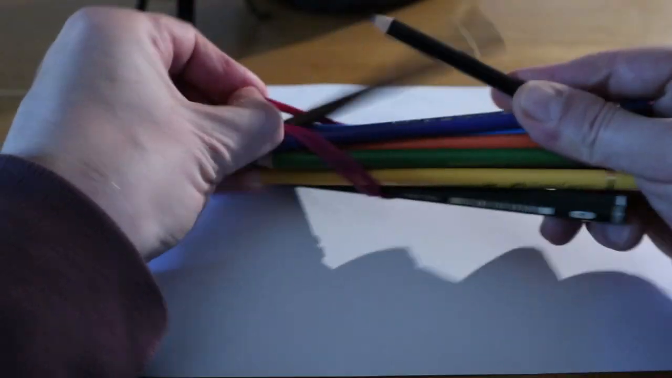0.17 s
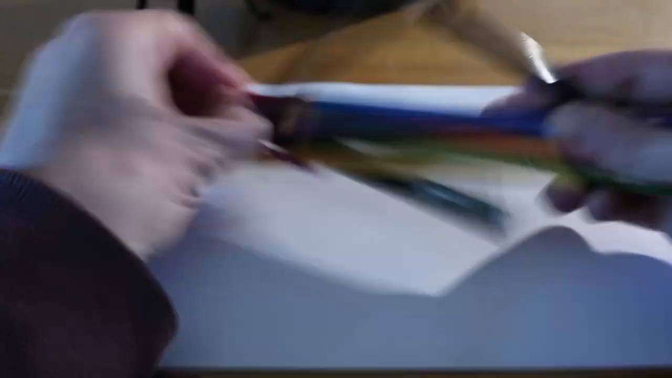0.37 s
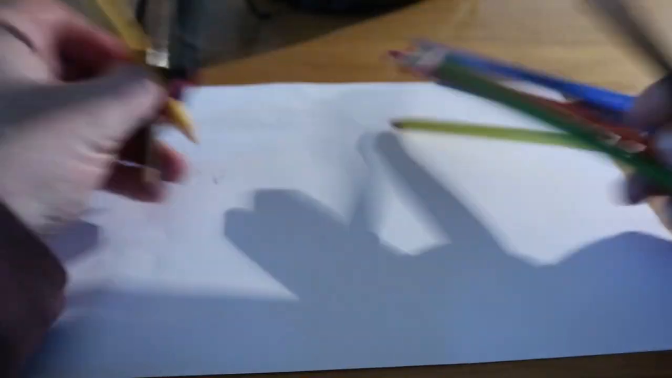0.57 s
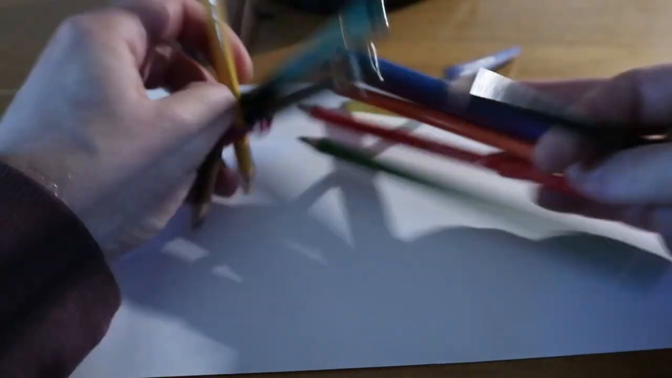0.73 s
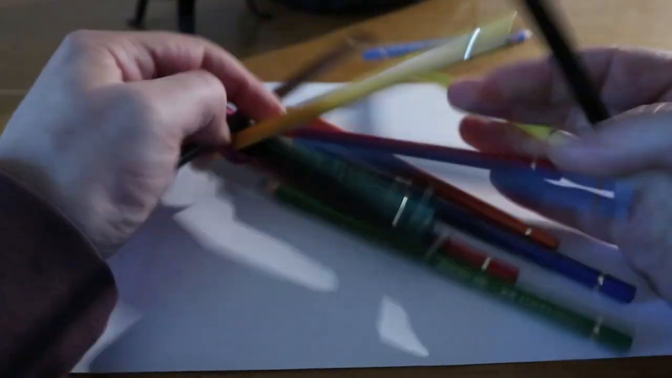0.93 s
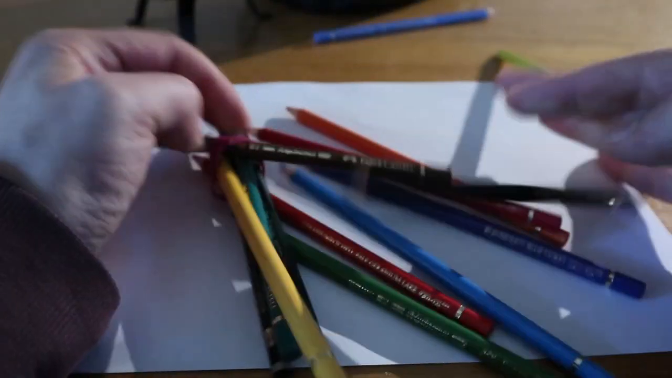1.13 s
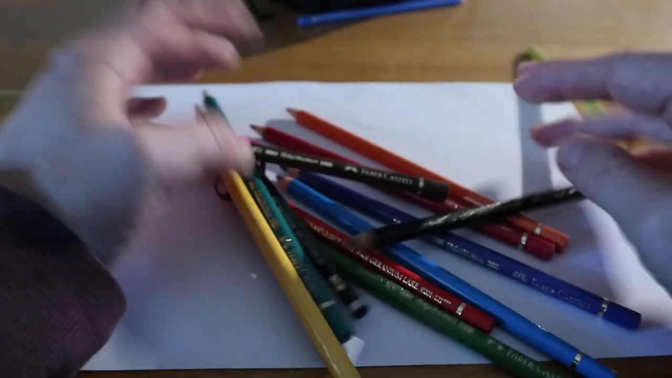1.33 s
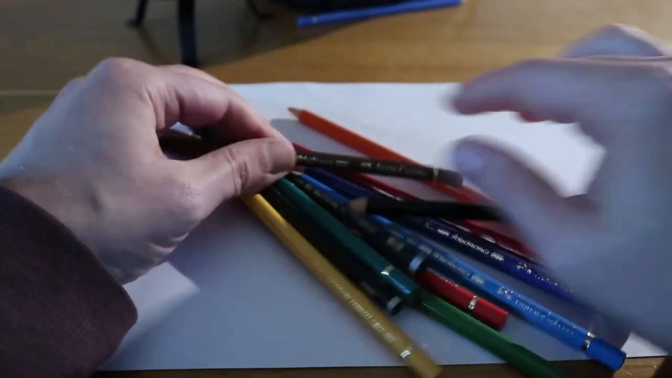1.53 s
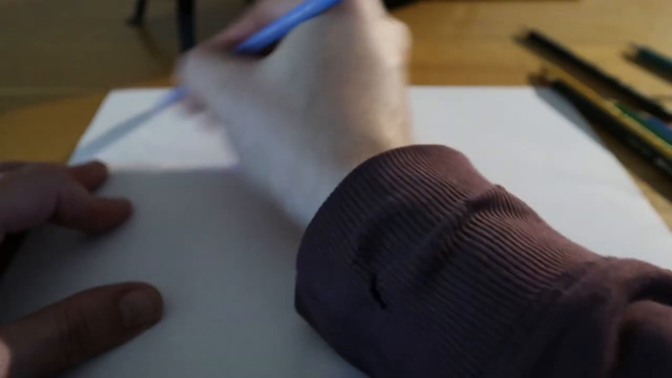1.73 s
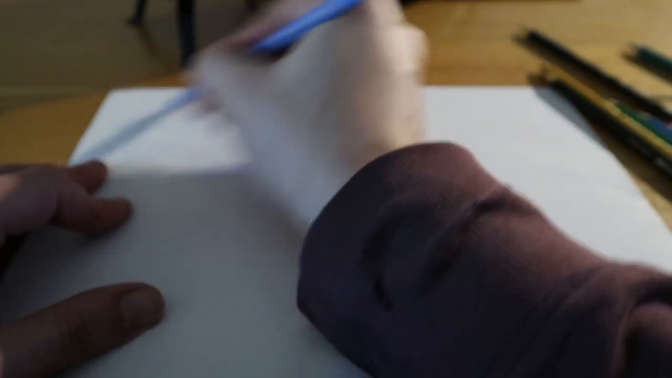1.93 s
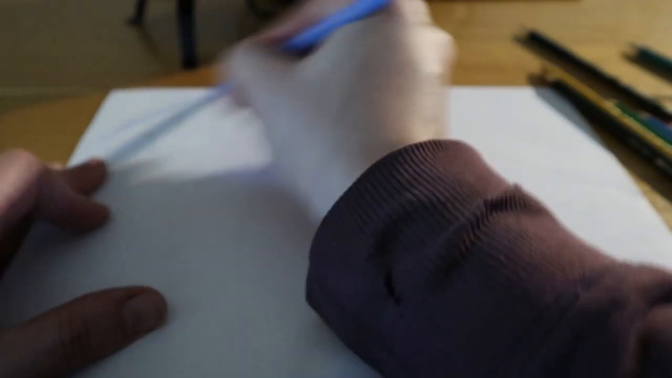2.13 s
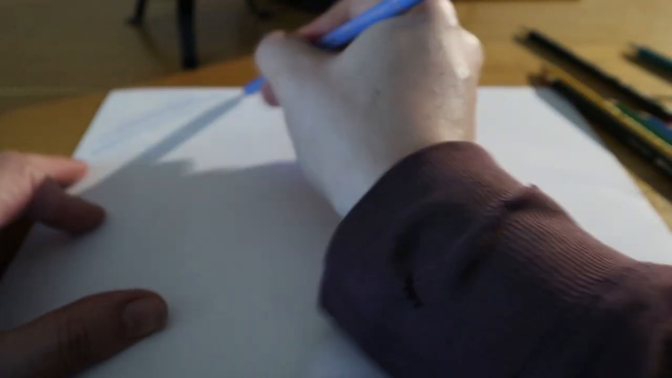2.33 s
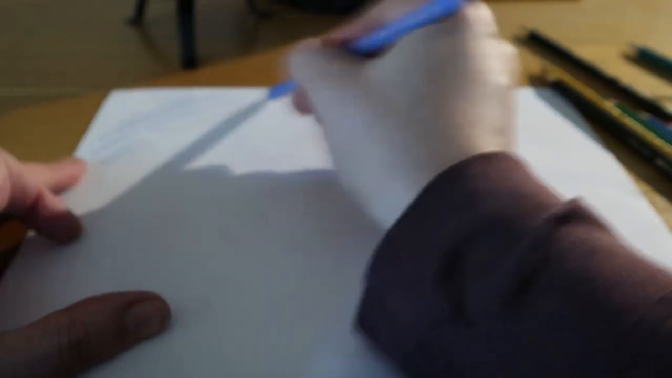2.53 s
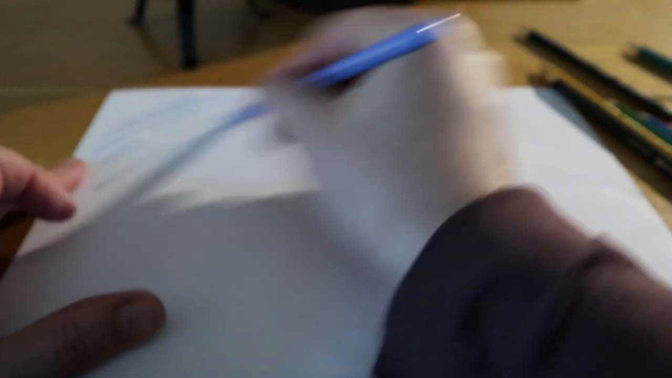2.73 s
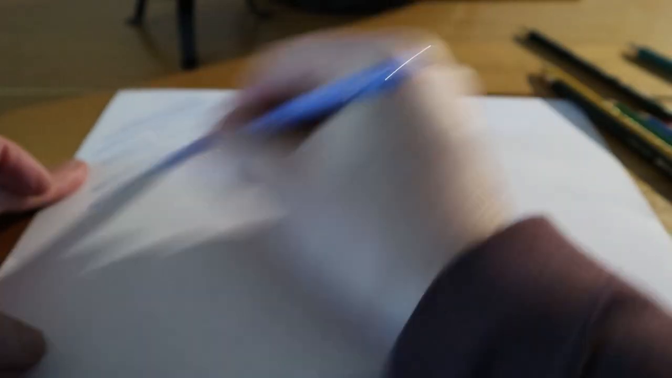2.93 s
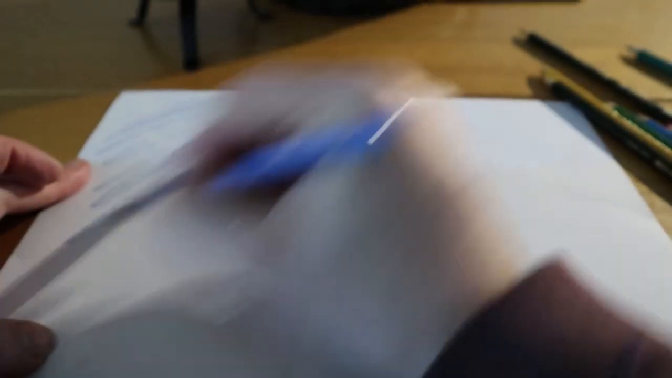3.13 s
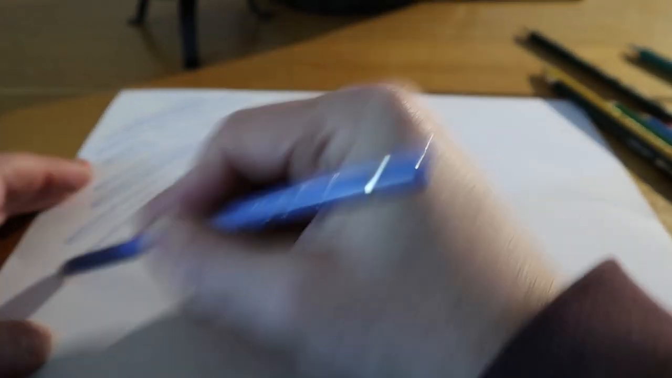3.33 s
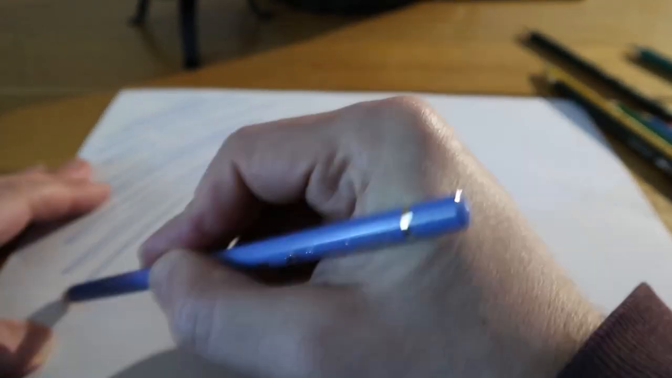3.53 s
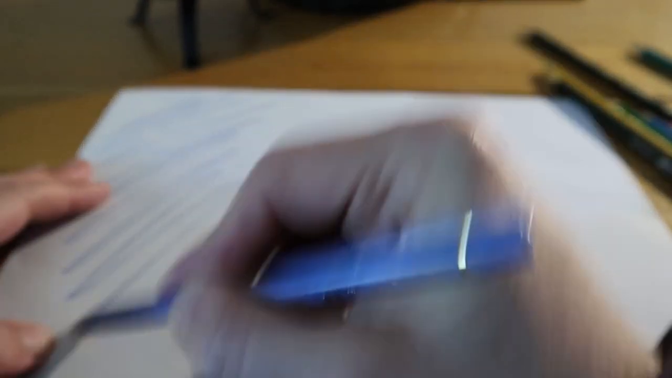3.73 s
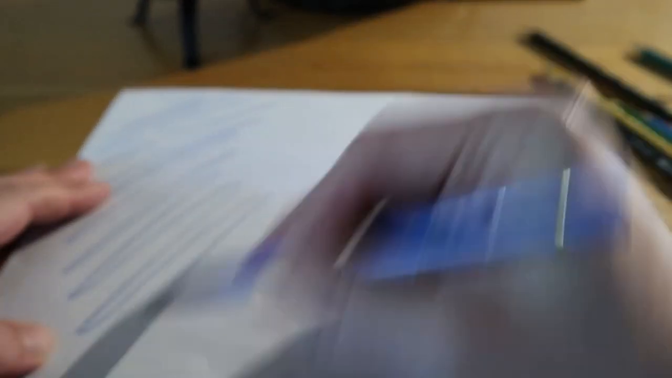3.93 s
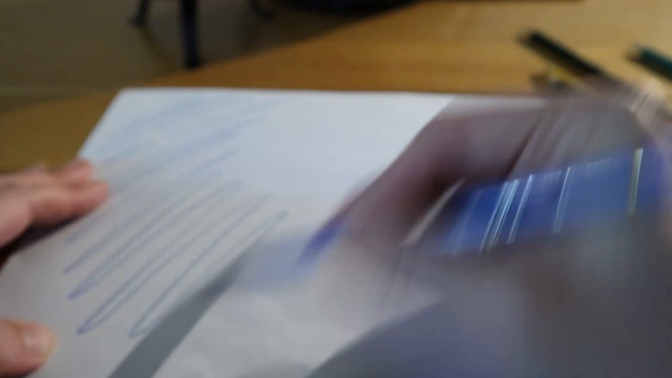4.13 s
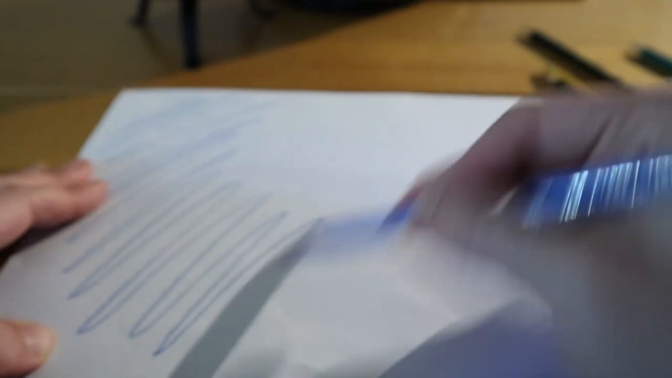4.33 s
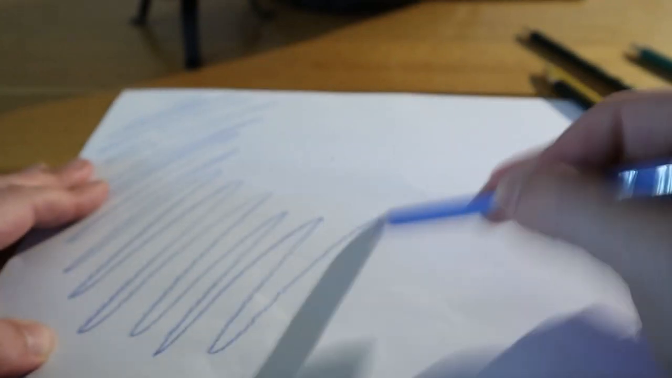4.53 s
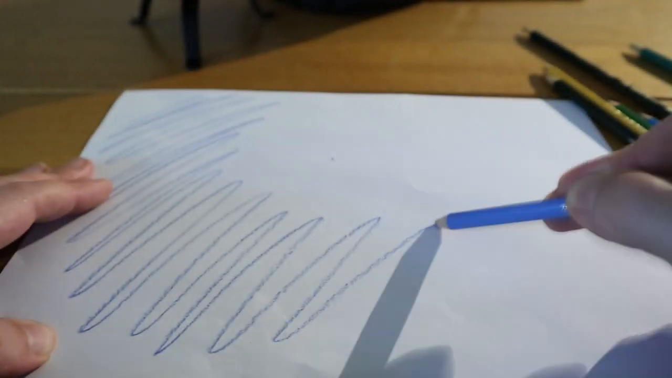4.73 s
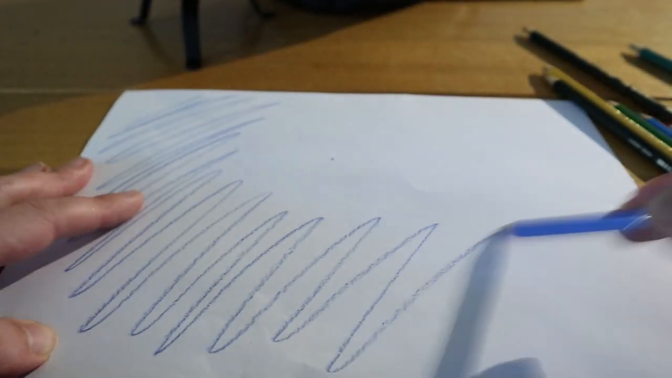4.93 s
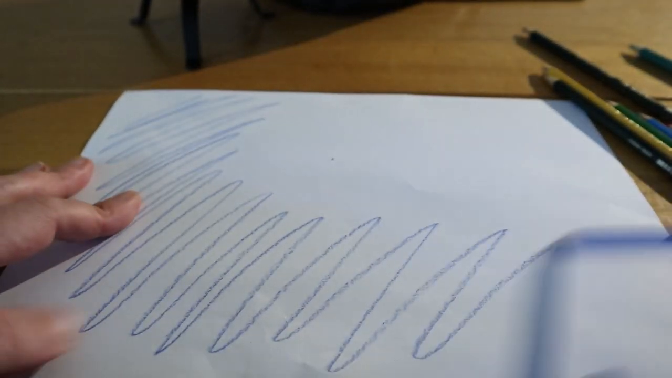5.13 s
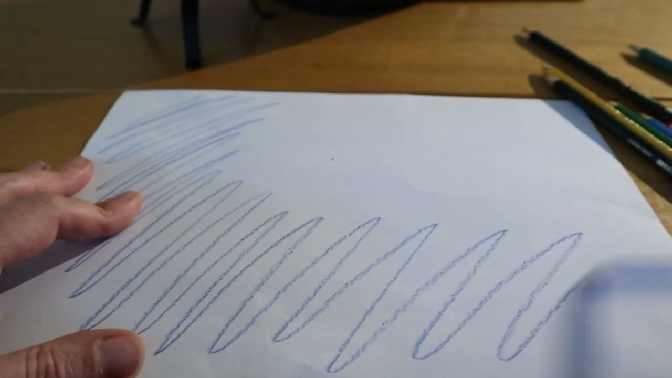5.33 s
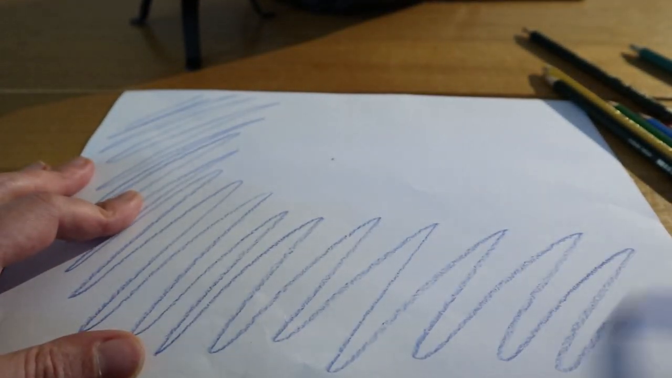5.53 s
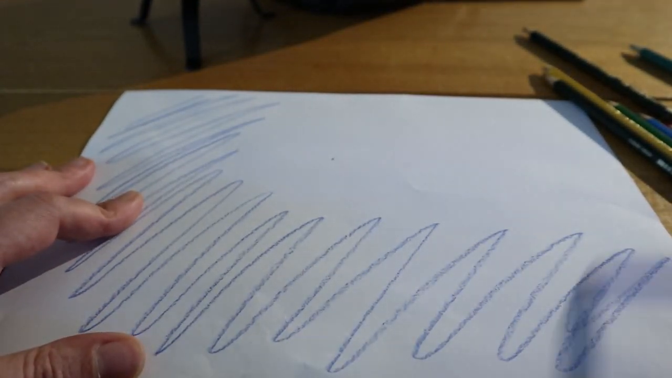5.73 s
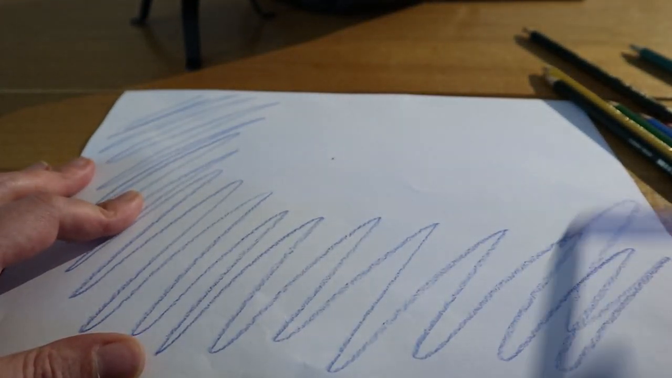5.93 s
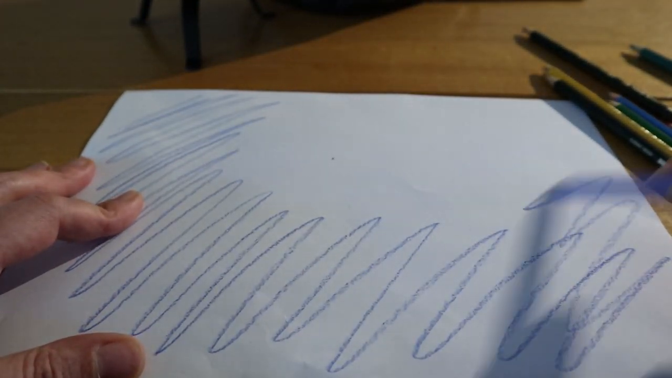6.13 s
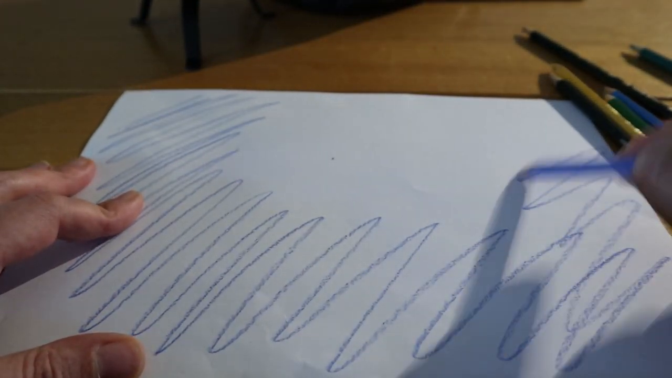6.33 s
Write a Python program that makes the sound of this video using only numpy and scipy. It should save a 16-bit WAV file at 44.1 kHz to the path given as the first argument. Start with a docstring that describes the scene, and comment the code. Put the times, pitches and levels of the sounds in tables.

```python
"""Pencils on a table

An elastic band drags and snaps off a bundle of wooden pencils, which drop and clatter on a table; then one
pencil scribbles to and fro on paper, moving from left to right, and at last nudges the pile.
Random impulses excite resonant shafts and table top (scrape, crackle); short pulses and decaying sines make
the blows. A short diffuse echo, steady air noise and a wavering hum complete a close stereo pickup."""
import sys
import numpy as np
from scipy import signal
from scipy.fft import rfft, irfft, next_fast_len
from scipy.io import wavfile
from scipy.ndimage import uniform_filter1d, map_coordinates

SR = 44100
rng = np.random.default_rng(int(sys.argv[2]) if len(sys.argv) > 2 else 0)


def digitize_waveform(pressure):
    """Quantize a signal to 16-bit integers and store it at the path in sys.argv[1].

    Rows of a 2-D input are taken as channels; values are limited to [-1, 1].
    """
    field = np.atleast_2d(pressure).T
    bounded = np.clip(field, -1, 1)
    quanta = np.round(bounded * 32767).astype(np.int16)
    wavfile.write(sys.argv[1], SR, quanta)


N = 286209
TIME = np.arange(N) / SR  # s

PEAK_OUT, PEAK_BACK = 0.48, 0.42  # share of a stroke at which speed peaks
TURN_DB, TURN_SCATTER_DB = -52, 4  # mean speed left at a turn, under the peak, and its spread


def hand_motion(start, back):
    """Harmonic motion: speed is nearly a rectified sine of phase, which gains one half-cycle a stroke."""
    peak_share = np.where(back, PEAK_BACK, PEAK_OUT)
    middle = start + peak_share * np.diff(np.append(start, N / SR))
    knots = np.append(np.ravel([start, middle], "F"), N / SR)
    phase = np.interp(TIME, knots, np.arange(2 * len(start) + 1) / 2)
    swing = np.abs(np.sin(np.pi * phase)) ** 0.95
    turn_db = TURN_DB + TURN_SCATTER_DB * rng.standard_normal(len(start))
    rest = np.minimum(amp(np.interp(TIME, start, turn_db)), 1)  # the tip never quite stops
    speed = (rest + (1 - rest) * swing) * (TIME > start[0])
    return middle, phase, speed


# Strokes, out and back in turn: start t/s, paper hiss level/dB, lower shaft modes level/dB over the hiss
STROKE_ROWS = [(1.63, -44.5, 0), (1.768, -39.5, -5), (1.877, -40.5, -4), (1.977, -39, -4),
               (2.076, -39.5, -0.5), (2.185, -35.5, -6), (2.29, -39, -2), (2.405, -37, -2.5),
               (2.513, -36, 3.5), (2.622, -37, -4), (2.732, -38, 0.5), (2.843, -37, -4), (2.956, -38.5, -3),
               (3.066, -37.5, 0.5), (3.174, -37.5, 2.5), (3.282, -39.5, -0.5), (3.408, -38, -9),
               (3.503, -39.5, -3), (3.614, -40, -9), (3.728, -36, 0), (3.832, -39.5, -4.5),
               (3.946, -38, -6), (4.054, -41, -6.5), (4.166, -38, -2.5), (4.271, -40, -1.5),
               (4.384, -38.5, -2), (4.482, -40, -2), (4.597, -38.5, -2.5), (4.693, -40, -5),
               (4.813, -39.5, 1.5), (4.917, -36, -12), (5.03, -40.5, -4.5), (5.13, -39, -5.5),
               (5.247, -41, -4), (5.351, -41, -5.5), (5.461, -41, -0.5), (5.561, -42.5, -1),
               (5.679, -41.5, 2), (5.771, -40.5, -3), (5.887, -41.5, -3), (5.983, -40, -8),
               (6.069, -39, -1.5), (6.177, -38, -9.5), (6.291, -39.5, -18), (6.392, -35, -15)]
# Graphite on fibres, spectrum of the hiss: f/Hz, relative level/dB per Hz
PAPER_SPECTRUM = [(300, -6), (1000, -4.5), (2200, -12.5), (2750, -12), (3300, -8), (3900, -11.5),
                  (5000, -9), (6000, -6), (7200, -5.5), (8400, -7.5), (10200, -1.5), (11500, -6.5),
                  (13000, -6.5), (15500, -10.5)]
# Held pencil, lower bending modes: f/Hz, width/Hz, relative level/dB
SHAFT_LOW_MODES = [(1380, 124, -12), (1630, 224, -3), (1726, 121, 4.5), (3144, 580, -11)]
# Held pencil, upper modes: f/Hz, width/Hz, relative level/dB
SHAFT_HIGH_MODES = [(4940, 500, 10), (7120, 660, 2.5), (9700, 1700, 4)]
# Upper shaft modes over the hiss: t/s, level/dB on strokes out, level/dB on strokes back
UPPER_LEVELS = [(1.63, -3.5, -13), (2.5, -4.5, -14), (3.3, 5.5, -7), (4.2, -1.5, -8.5), (4.9, -6, -12),
                (5.4, 2, 1), (5.8, -6.5, -10), (6.49, -19, -18)]
# Mean pitch sought by the main shaft mode as the fingers shift: t/s, f/Hz
GRIP_PITCH = [(1.69, 1787), (3.49, 1735), (4.87, 1786), (5.23, 1850), (5.53, 1710), (5.71, 1710),
              (5.86, 1920), (6.29, 1785), (6.45, 1900)]
# Mean pitch sought by the first upper mode, drifting as the pencil tilts: t/s, f/Hz
TILT_PITCH = [(1.65, 4480), (1.76, 4650), (3.33, 4880), (3.35, 5250), (4.87, 4940), (5.56, 5580),
              (5.8, 5100), (6.05, 5100)]
# Bands between the modes where the shaft weakens the scrape: f/Hz, width/Hz
SHAFT_HOLLOWS = [(2750, 340), (3950, 410), (5950, 430)]
GRIP_SCATTER = 0.023  # further share by which each stroke's pitch strays
SWEEP = 0.027  # share either side of the mean: the upper pitch rises on strokes out, falls on the way back


def scribble():
    """Friction excitation: fibres pluck the tip in step with hand speed; shaft and table resonate."""
    start, hiss_db, low_db = np.transpose(STROKE_ROWS)
    back = np.arange(len(start)) % 2 == 1
    middle, phase, speed = hand_motion(start, back)
    s, out_db, back_db = np.transpose(UPPER_LEVELS)
    high_db = np.where(back, np.interp(start, s, back_db), np.interp(start, s, out_db))

    def level(db):
        return speed * amp(np.interp(TIME, middle, db))

    def finger_weight():
        # the fingers shift weight between the modes
        return flutter(14, depth_db=1.8)

    fibres = filtered(grit(0.12, spread_db=3), lambda hz: amp(along(PAPER_SPECTRUM, hz)))
    hiss = unit(patchy(fibres, depth_db=4))
    treble = filtered(hiss, lambda hz: 1 / (1 + (10500 / (hz + 1)) ** 8))
    # hiss above about 10 kHz grows further with the level of the hiss
    hiss = hiss + treble * (amp(0.044 * (np.interp(TIME, middle, hiss_db) + 37.0)) - 1)

    plucks = grit(0.15, spread_db=1) * flutter(45, depth_db=1.5)
    pitch = np.interp(middle, *np.transpose(GRIP_PITCH)) / SHAFT_LOW_MODES[2][0]
    pitch = pitch + GRIP_SCATTER * rng.standard_normal(len(start))
    # the pitch strays within a stroke too
    ratio = np.interp(TIME, middle, pitch) * flutter(30, depth_db=0.25)
    main_modes = gliding(plucks, SHAFT_LOW_MODES[1:3], ratio) * finger_weight()
    outer_modes = sum(filtered(plucks, modes([mode])) * finger_weight() for mode in SHAFT_LOW_MODES[::3])
    low = unit(main_modes + outer_modes)
    low = low * np.minimum(1.2 * speed, 1) ** 0.56  # a slow tip hardly plucks the shaft

    scrapes = grit(0.1, spread_db=0) * flutter(45, depth_db=2.5)
    tilt = np.interp(TIME, *np.transpose(TILT_PITCH)) / SHAFT_HIGH_MODES[0][0]
    tilt = tilt - SWEEP * np.cos(np.pi * phase)
    high = unit(gliding(scrapes, SHAFT_HIGH_MODES[:1], tilt)
                - filtered(scrapes, modes(SHAFT_HIGH_MODES[1:])))

    board = unit(filtered(grit(0.05, spread_db=4.5), modes(TABLE_MODES)))
    sound = level(hiss_db) * (hiss + amp(-7.5) * board)
    sound += level(hiss_db + low_db) * low + level(hiss_db + high_db) * high

    def hollowed(f):
        # each hollow keeps 0.3 of the amplitude at its centre
        return np.prod([(c * c - f * f + 0.3j * f * w) / (c * c - f * f + 1j * f * w)
                        for c, w in SHAFT_HOLLOWS], 0)

    return filtered(sound, hollowed) + catches()


# The tip catches on the sheet: t/s, relative level/dB, lower shaft modes relative level/dB over it
CATCH_ROWS = [(2.199, -25, 2), (2.537, -19, -2), (3.3156, -25, 8.5), (3.235, -28, -3), (3.473, -19, -1.5),
              (3.688, -17, 0), (3.7, -28.5, 11), (3.88, -10.5, -7), (4.9574, 1.5, -6.5)]


def catches():
    """Impulse response: a noise tick excites paper and upper modes, a unit pulse the lower modes."""
    tick, pluck = np.zeros((2, N))
    for s, db, ring_db in CATCH_ROWS:
        add(tick, s, amp(db - 24.5 - 60 * TIME[:300] / 0.01) * rng.standard_normal(300))
        add(pluck, s, amp(db + ring_db + 27.5) * np.ones(1))
    ticking = filtered(tick, lambda hz: amp(along(PAPER_SPECTRUM, hz)) + 3.8 * modes(SHAFT_HIGH_MODES)(hz))
    return ticking + filtered(pluck, modes(SHAFT_LOW_MODES))


# Pencil meets pencil or table: t/s, peak level/dB before the bass cut, lower ring f/Hz, upper ring f/Hz,
# then relative levels: upper modes/dB, table knock/dB over the peak, middle table modes/dB over the peak
CLACK_ROWS = [(0.064, -35, 2500, 6060, -13, 4, -8), (0.096, -25.5, 3750, 5750, -16, 6.5, -9),
              (0.2252, -20, 3370, 5770, -10.5, -14, -20), (0.2612, -28, 2410, 5650, -15, -14, -15),
              (0.5571, -20.5, 4570, 6440, -11, 11, -12), (0.584, -22, 2900, 7300, 2, 12, -12),
              (0.6379, -15, 1450, 5780, -36, 3, -7), (0.6635, -15.5, 4580, 10400, -10, 6, -9),
              (0.7374, -14.5, 1500, 6240, -12, 4, -13), (0.753, -18.5, 4560, 6300, -5, 11, -9),
              (0.7967, -21, 4660, 6450, -16, -9, -15), (0.824, -14.5, 4030, 6460, -12, -0.5, -17),
              (0.835, -16.5, 4640, 6400, -13, 5, -13), (0.852, -13.5, 4570, 6450, -6, -2, -16),
              (0.863, -16, 4500, 7300, 3, -1, -14), (.886, -17, 4560, 7200, -4, 6, -16),
              (0.8931, -16, 3040, 7160, -9, 11, -12), (0.9121, -15.5, 4350, 6300, -15, 13.5, -8),
              (0.9247, -14, 4100, 5600, -7, -9, -11), (0.958, -17, 4070, 5600, -5, -12, -11),
              (.966, -13.5, 1830, 6450, -8, 10, -7), (0.995, -19, 1690, 6400, -19, 0, -5),
              (0.998, -16.5, 4200, 8700, -14, 7.5, -10), (1.014, -31, 2900, 6500, -8, 17, 2),
              (1.042, -15, 4050, 9450, -4, 9, 0), (1.057, -3, 4560, 7480, 4, 2.5, 1),
              (1.0954, -16.5, 4520, 6450, 2, 9, 0), (1.116, -15.5, 4640, 6400, -18, 6, 2),
              (1.1502, -11.5, 2400, 7300, 8, 5, -6), (1.182, -15, 3750, 6540, 3, -4, 5),
              (1.1893, 4, 3170, 6760, -6, 3, -7), (1.203, -11.5, 3720, 9000, 1, -6, 12.5),
              (1.227, -16, 3750, 5740, 4, 6, 7), (1.2498, -15, 3600, 6600, -18, 11, 3),
              (1.2644, -15, 1560, 8650, -6, 8, 12), (1.3111, -9.5, 3750, 8700, -2, 2, 2),
              (1.3866, -24, 2750, 6450, -18, 13, -6), (1.427, -11.5, 4570, 7300, -5, -19, -14),
              (1.437, -17.5, 4620, 7300, -1, -4, 8.5), (1.4522, -11, 3750, 6450, -7, 0, -3),
              (1.461, -17, 4550, 7300, -6, -8, -3), (1.469, -11.5, 3900, 5950, 4, 6, -5),
              (1.476, -8, 2560, 9600, -17.5, 9, 6), (1.4864, -14, 2100, 9600, -12, 14, 9),
              (1.52, -21.5, 4580, 5700, -27, -1, -2), (1.5348, -22, 3750, 5600, -18, -8, -6),
              (1.5641, -2, 4300, 9300, -3, -9, -20), (1.576, -32, 2180, 9400, 8, -7, 2),
              (1.6003, -38.5, 1520, 6500, 8, 22, 0), (6.0761, -26, 4340, 7350, -11, -1, -9),
              (6.11, -27, 1640, 5700, -21, 10, -10), (6.128, -28.5, 1420, 10300, -11, 8, -5),
              (6.1551, -23, 2430, 5760, 10, 0, -8), (6.2558, -19.5, 4130, 6630, -4, 5, -3),
              (6.327, -15, 2390, 5750, -3, -14, -12), (6.448, -24, 2400, 6040, 6, -13, -13)]
# Modes of loose pencils: mean f/Hz, relative level/dB, t60/s
LOOSE_MODES = [(1450, -13, 0.018), (1770, -9.5, 0.088), (2100, -4.5, 0.032), (2420, -5.5, 0.033),
               (2900, 0, 0.028), (3750, 3.5, 0.0066), (4120, -7, 0.027), (4530, 0, 0.019),
               (5100, -1, 0.0078), (5750, 0, 0.019), (6460, 4, 0.018), (7200, 1.5, 0.022),
               (8700, 3.5, 0.012), (9760, 4, 0.015), (10400, 5, 0.0081)]
# Pencils shifting in the hand, rolling on the table, nudged at the end, one list for each spell:
# t/s, small contacts level/dB, table rumble level/dB
JOSTLE_SPELLS = [
    [(0, -33.5, -61), (.12, -114, -47), (.2, -61, -66), (.24, -40.5, -45), (.36, -53, -53), (.41, -55, -43),
     (.46, -55, -24.5), (.51, -60, -40)],
    [(.552, -32, -40), (.6, -50, -44), (.625, -64, -65), (.64, -58, -38), (.81, -58, -51.5),
     (.84, -31, -29.5), (.945, -35.5, -37), (1.0, -35.5, -29.5), (1.06, -40, -30), (1.2, -36, -36.5),
     (1.32, -45, -28), (1.39, -61, -46), (1.48, -51, -30.5), (1.62, -67, -40.5)],
    [(6.03, -49, -45), (6.09, -56, -42), (6.135, -59, -38.5), (6.2, -58, -51.5), (6.26, -48, -48.5),
     (6.35, -46, -38.5), (6.43, -61, -46), (6.49, -62, -47)],
]
TUMBLE_S = 0.007  # time within which a pencil settles
RATTLE_DB, RATTLE_T60_S = -20, 0.12  # faint contacts that follow a clack
ROLL_DB, ROLL_T60_S = -25.5, 0.12  # table rumble that follows a knock


def clatter():
    """Impact excitation: contacts ring pencil modes and knock the table; rattle and rolling die away."""
    wood, blows, taps = np.zeros((3, N))
    for s, db, low_hz, high_hz, high_db, knock_db, middle_db in CLACK_ROWS:
        hit = contact(db, low_hz, high_hz, high_db)
        add(wood, s, amp(db) * hit / np.abs(hit).max())
        add(blows, s, amp(db + knock_db) * np.hanning(12))
        add(taps, s, -amp(db + middle_db) * np.hanning(30))
    small, rumble = sum(gains(rows) for rows in JOSTLE_SPELLS)
    small += lingering([(c[0], c[1] + RATTLE_DB) for c in CLACK_ROWS], RATTLE_T60_S)
    rumble += lingering([(c[0], c[1] + c[5] + ROLL_DB) for c in CLACK_ROWS], ROLL_T60_S)
    wood += small * jostling(count=9000)
    wood = filtered(wood, lambda hz: (1j * hz / (700 + 1j * hz)) ** 2)  # bass cut
    rough = grit(0.08, spread_db=3) * flutter(30, depth_db=2.5)
    rolling = rumble * unit(filtered(rough, knocked))
    return wood + rolling + filtered(blows, knocked) + filtered(taps, modes(TABLE_MODES[6:9]))


def contact(db, low_hz, high_hz, high_db):
    """Modal synthesis: the spot struck selects decaying sines, joined by a noise crack and chatter."""
    t = np.arange(SR // 16) / SR
    hz, mode_db, t60 = np.transpose(LOOSE_MODES)[:, :, None]
    chance = rng.standard_normal((2, len(hz), 1))

    def near(pitch_hz):
        # 110 dB an octave away from the pitch, at most 18 dB down
        return amp(-np.minimum(110 * np.abs(np.log2(hz / pitch_hz)), 18))

    picked = np.where(hz < 5500, near(low_hz), amp(high_db - 1.5) * near(high_hz))
    strength = amp(mode_db + 0.49 * chance[0]) * picked
    ring_hz = hz * (1 + 0.01 * chance[1])  # lengths differ
    ring = np.sum(strength * amp(-60 * t / t60) * np.sin(2 * np.pi * ring_hz * t), 0)
    noise = rng.standard_normal((2, len(t)))
    crack = amp(high_db + 7.0 - 60 * t / 0.0057) * noise[0]
    # long bodies land bit by bit
    chatter = 0.4 * amp(-60 * t / 0.016) * signal.lfilter(*signal.iirpeak(low_hz, 0.8, SR), noise[1])
    hit = (ring + crack + chatter) * (1 - np.exp(-t / 0.00038))
    # light contacts come as a few overlapping touches, hard ones nearly as one blow
    tumble = np.zeros(round(TUMBLE_S * SR) + 1)
    tumble[(rng.random(2) * TUMBLE_S * SR).astype(int)] = min(amp(-db - 18), 0.6)
    tumble[0] = 1
    return signal.fftconvolve(hit, tumble)


def jostling(count):
    """Superposition: many random faint contacts, each a short ring near a pencil mode; rms 1."""
    onset = (rng.random((count, 1)) * N).astype(int)
    pick = (rng.random(count) * len(LOOSE_MODES)).astype(int)
    chance = rng.standard_normal((count, 3))
    hz, db, _ = np.transpose(LOOSE_MODES)[:, pick, None]
    hz = hz * (1 + 0.025 * chance[:, :1])
    size_db = 4 * chance[:, 1:2]
    cycles = 18 * np.exp(0.5 * chance[:, 2:])  # cycles in a 60 dB decay
    dull_db = -4 * np.log2(hz / 3000)  # light contacts hardly stir the top modes
    n = np.arange(250)
    decay = amp(db + size_db + dull_db - 60 * n * hz / SR / cycles)
    rings = decay * np.sin(2 * np.pi * hz * n / SR)
    return unit(np.bincount((onset + n).ravel(), rings.ravel(), N + len(n))[:N])


# Elastic band slips, pencil by pencil: t/s, relative level/dB, centre f/Hz
SLIP_ROWS = [(0.416, -13, 4170), (0.429, 3, 9800), (0.4291, -0.5, 2530), (0.4447, 18, 7000),
             (0.4469, 11, 6200), (0.4528, 4, 6540), (0.462, 1, 5210), (0.4758, 1, 7800), (0.485, 12, 9700),
             (0.4963, -5, 6520), (0.528, -3.5, 6360)]
# Rubber dragging over lacquer: t/s, level/dB
DRAG_LEVELS = [(.372, -52), (.41, -37), (.42, -24), (.442, -19), (.465, -15.5), (.48, -20), (.5, -27),
               (.52, -41)]
# Spectrum of the rubber crackle: f/Hz, relative level/dB per Hz
RUBBER_SPECTRUM = [(290, -47), (500, -33), (686, -11), (1530, -15), (2010, -2), (3900, 0.5), (6450, -4.5),
                   (9510, -9), (15500, -9)]


def elastic():
    """Stick-slip: rubber drags with a dense crackle and lets go in broad, dry snaps that jolt the bundle."""
    crackle = grit(0.15, spread_db=2) * flutter(90, depth_db=2.5)
    crackle = unit(filtered(crackle, lambda hz: amp(along(RUBBER_SPECTRUM, hz))))
    sound = gains(DRAG_LEVELS)[0] * crackle
    t, jolts = np.arange(1500) / SR, np.zeros(N)
    for s, db, hz in SLIP_ROWS:
        burst = amp(-60 * t / 0.0065) * rng.standard_normal(len(t))
        tone = signal.lfilter(*signal.iirpeak(hz, 1.6, SR), burst)
        edge = 0.36 * burst * amp(-60 * t / 0.00057)
        add(sound, s, amp(db) * (tone / np.abs(tone).max() + edge))
        add(jolts, s, amp(db - 21.0) * np.hanning(12))
    return sound + filtered(jolts, knocked)


# A wrist bumps the table: t/s, relative level/dB, contact time/s
WRIST_BUMPS = [(.068, -38, 0.0038), (0.12, -35.5, 0.0014), (.7, -30, 0.013), (3.168, -20, 0.002),
               (3.174, -19, 0.0015), (3.1795, -5, 0.0016), (3.189, -14, 0.002), (3.204, -18, 0.002),
               (4.92, -30, 0.013)]
# Table top damped by the hand: f/Hz, width/Hz, relative level/dB
DAMPED_MODES = [(43, 35, -8), (153, 65, 0.5), (268, 330, 2), (370, 210, 5), (583, 290, -1),
                (880, 2200, -8.5)]
# Two table modes hum on under the moving hand, one list for each spell: t/s, level/dB
DRONE_SPELLS = [
    [(3.19, -45.5), (3.4, -53)],
    [(6.23, -56), (6.27, -39), (6.35, -44), (6.45, -53)],
]
SHUDDER_DB, SHUDDER_T60_S = -5, 0.3  # the top shudders on after a bump


def wrist():
    """Contact time sets bandwidth: soft blows stir mainly low, damped modes, which shudder and hum on."""
    blows = np.zeros(N)
    for s, db, contact_s in WRIST_BUMPS:
        add(blows, s, amp(db) * np.hanning(round(contact_s * SR)))
    soft_noise = uniform_filter1d(rng.standard_normal(N), size=16)
    shudder = lingering([(s, db + SHUDDER_DB) for s, db, _ in WRIST_BUMPS], SHUDDER_T60_S) * soft_noise
    two_modes = unit(filtered(rng.standard_normal(N), modes(TABLE_MODES[4:9:4])))
    drone = sum(gains(rows)[0] for rows in DRONE_SPELLS) * two_modes
    return filtered(blows + shudder, modes(DAMPED_MODES)) + amp(-17) * filtered(blows, knocked) + drone


# Table top: f/Hz, width/Hz, relative level/dB
TABLE_MODES = [(45, 26, -22), (164, 130, -1), (263, 19.3, 8), (327.6, 17, 3.5), (381.4, 17, 5),
               (553, 176, -8), (659, 35, 3), (740, 44, 1.5), (1035, 264, -6), (1420, 580, -6)]


def knocked(hz):
    """Modal response of the table top under light things, without the deepest bass."""
    return modes(TABLE_MODES[1:])(hz) * (1j * hz / (50 + 1j * hz)) ** 4


# Mean place of the action: t/s, lag of left behind right/samples, left minus right level/dB
PLACE = [(0, .5, -1.5), (.5, 0.74, -0.3), (1.5, 0.84, -0.5), (1.7, 1.1, 1.5), (2.5, 1.1, 1.5),
         (3.5, 0.27, 1), (4.3, 0.1, 0), (5.2, 2.02, -1), (6.49, 1.2, -0.5)]


def placed(x, scatter, size=1500):
    """Stereophony by time and level differences, which scatter with a new random knot every size samples."""
    s, lag, pan_db = np.transpose(PLACE)
    n = np.arange(N)
    shift = scatter * map_coordinates(rng.standard_normal(N // size + 4), [n / size])
    lag = np.interp(TIME, s, lag) + shift
    pan_db = np.interp(TIME, s, pan_db) - shift
    return np.array([amp(k * pan_db / 2) * map_coordinates(x, [n - k * lag / 2], order=4) for k in (1, -1)])


# Reverberation time: f/Hz, t60/s
WALL_DECAY = [(200, 0.13), (2000, 0.13), (10000, 0.077)]


def walls(x, count=16):
    """Diffuse reverberation: noise decays at a rate set by frequency, drawn afresh for each of count spans."""
    out, step = np.zeros((2, N + SR)), N // count + 1
    for k in range(count):
        hz, t, z = signal.stft(rng.standard_normal((2, SR // 3)), SR, nperseg=256)
        decay = amp(-60 * t / along(WALL_DECAY, hz)[:, None])
        tail = signal.istft(z * decay, SR, nperseg=256)[1]
        part = x[None, k * step:(k + 1) * step]
        echo = signal.fftconvolve(part, tail / np.linalg.norm(tail[0]), axes=1)
        out[:, k * step + 120:][:, :echo.shape[1]] += echo  # 120 samples of delay
    return paired(out[:, :N], lambda hz: 1)


# Left-right correlation of echo and air: f/Hz, likeness
LIKENESS = [(60, 1), (300, 0.68), (700, 0.17), (2000, 0.15), (5000, 0.03), (10000, 0.034)]


def paired(two, colour):
    """Mid-side mixing: two unrelated signals become a pair of given correlation, alike in the bass."""
    def turn(hz):
        return np.arccos(np.clip(along(LIKENESS, hz), -1, 1)) / 2

    mid, side = filtered(two, lambda hz: colour(hz) * np.array([np.cos(turn(hz)), np.sin(turn(hz))]))
    return np.array([mid + side, mid - side])


# Spectrum of the air: f/Hz, relative level/dB per Hz
AIR_SPECTRUM = [(13, -40), (22, -4), (45, -3), (68, -11.5), (102, 1.5), (215, -7), (392, 2.5), (560, -10),
                (1080, -10.5), (1770, -14), (2600, -12), (5170, -16.5), (8710, -19.5), (10300, -19.5),
                (11800, -19), (15500, -81)]
# Machine tones, wavering: f/Hz, mean peak level/dB
HUM_TONES = [(100, -53), (120, -69)]


def room_tone():
    """Stationary noise: filtered, slowly wavering air with steady-pitched machine tones."""
    air = paired(rng.standard_normal((2, N)), lambda hz: amp(along(AIR_SPECTRUM, hz)))
    hum = sum(amp(db) * flutter(17, depth_db=1.5) * np.sin(2 * np.pi * hz * TIME) for hz, db in HUM_TONES)
    return amp(-46.5) * unit(air) * flutter(2.1, depth_db=0.7) + hum


def amp(db):
    """Logarithmic level: decibels to gain."""
    return 10 ** (np.asarray(db) / 20)


def unit(x):
    """Normalisation to rms 1."""
    return x / np.sqrt(np.mean(x ** 2) + 1e-20)


def along(points, hz):
    """Interpolation of (Hz, value) points on a logarithmic frequency axis."""
    f, v = np.transpose(points)
    return np.interp(np.log(hz + 1), np.log(f + 1), v)


def gains(rows):
    """Envelopes: a gain per sample for each dB column, practically silent outside the rows."""
    s, *cols = np.transpose(rows)
    return np.array([amp(np.interp(TIME, s, c, -200, -200)) for c in cols])


def filtered(x, response):
    """Linear filtering: the spectrum of x times a complex response of frequency."""
    m = next_fast_len(N + SR // 2)
    return irfft(rfft(x, m) * response(np.fft.rfftfreq(m, 1 / SR)), m)[..., :N]


def modes(table):
    """Modal superposition: causal response of resonances with alternating signs."""
    def response(f):
        return sum((-1) ** k * amp(db) * 1j * f * w / (c * c - f * f + 1j * f * w)
                   for k, (c, w, db) in enumerate(table))
    return response


def gliding(x, table, ratio):
    """Moving resonance: crossfades fixed tunings to follow a pitch ratio held within their range."""
    tunings = np.array([0.88, 0.92, 0.96, 1, 1.04, 1.08])
    steps = np.arange(len(tunings))
    distance = np.abs(np.interp(ratio, tunings, steps) - steps[:, None])
    fade = np.sqrt(np.maximum(1 - distance, 0))
    return np.sum(fade * filtered(x, lambda f: np.array([modes(table)(f / r) for r in tunings])), 0)


def grit(share, spread_db):
    """Shot noise: random impulses of uneven size on a share of the samples, rms 1."""
    u, size, sign = rng.random(N), rng.exponential(size=N), rng.standard_normal(N)
    return unit((u < share) * amp(spread_db * np.minimum(size, 3)) * sign)


def flutter(rate, depth_db):
    """Random amplitude modulation: a smooth gain with rate knots a second."""
    knots = rng.standard_normal(int(N * rate / SR) + 4)
    return amp(depth_db * map_coordinates(knots, [np.arange(N) * rate / SR]))


def patchy(x, depth_db):
    """Time-frequency modulation: random gain in blotches of time and pitch."""
    z = signal.stft(x, nperseg=256)[2]
    field = uniform_filter1d(rng.standard_normal(z.shape), size=4, axis=0)
    field = uniform_filter1d(field, size=16, axis=1)
    return signal.istft(z * amp(depth_db * unit(field)), nperseg=256)[1][:N]


def lingering(events, t60):
    """Exponential decay: a gain jumps at each (s, dB) event and dies for up to 0.25 s; powers add."""
    power = np.zeros(N)
    for s, db in events:
        add(power, s, amp(2 * db - 120 * np.arange(SR // 4) / SR / t60))
    return np.sqrt(power)


def add(track, s, sound):
    """Superposition: mixes a sound into a track at a time in seconds."""
    part = track[round(s * SR):][:len(sound)]
    part += sound[:len(part)]


def scene():
    """Superposition of direct sound, echo and room."""
    drawing, pile = scribble(), elastic() + clatter() + wrist()
    direct = placed(drawing, scatter=0.54) + placed(pile, scatter=0.4, size=400)
    thin_pile = filtered(pile, lambda hz: 1j * hz / (900 + 1j * hz))
    echo = walls(amp(-4.5) * drawing + amp(-8.0) * thin_pile)
    return direct + echo + room_tone()


# Microphone response: f/Hz, gain/dB
MIC_RESPONSE = [(20, 2), (10500, 0), (12500, -4.5), (14000, -16), (15500, -35)]
TOP_HZ = 15700  # end of the band


def record(dry):
    """Compression: gain falls with smoothed power; treble rolls off, peaks saturate, the band ends."""
    power = uniform_filter1d(np.mean(dry ** 2, 0), 400)
    memory = signal.lfilter([1 / 2500], [1, 1 / 2500 - 1], np.abs(power))  # 2500-sample time constant
    x = dry / (1 + memory / amp(-51.5)) ** 0.2
    x = filtered(x, lambda hz: amp(along(MIC_RESPONSE, hz)))
    saturated = 0.82 * x / (1 + np.abs(x) ** 6) ** (1 / 6)
    return filtered(saturated, lambda hz: hz < TOP_HZ)


dry = scene()
out = record(dry)
digitize_waveform(out)
```